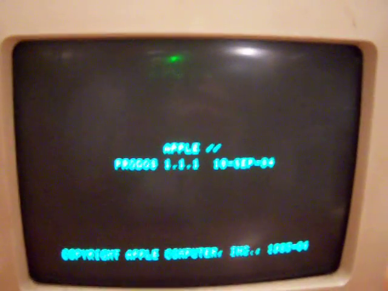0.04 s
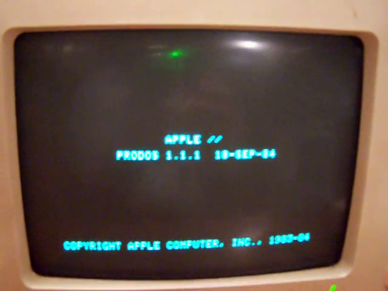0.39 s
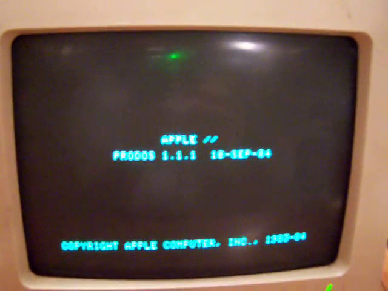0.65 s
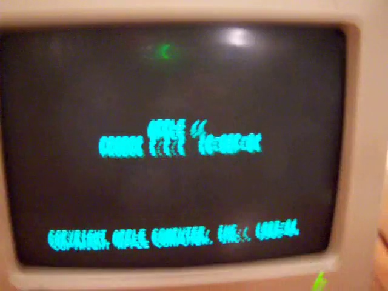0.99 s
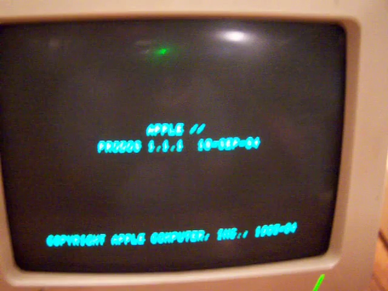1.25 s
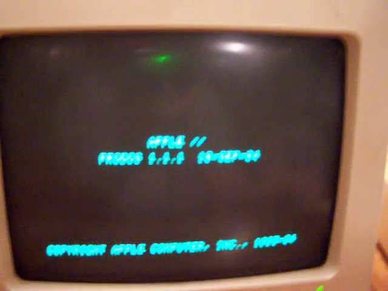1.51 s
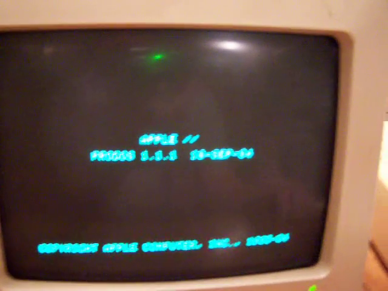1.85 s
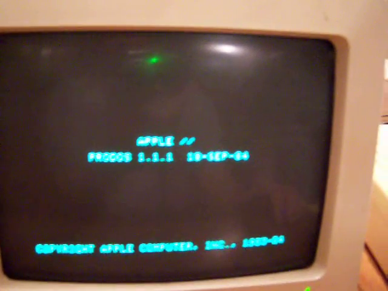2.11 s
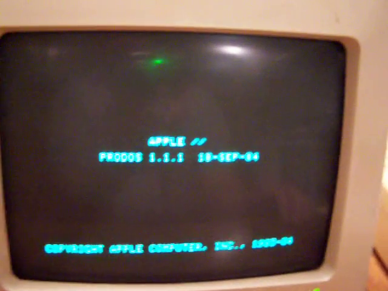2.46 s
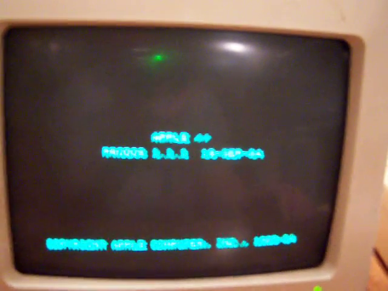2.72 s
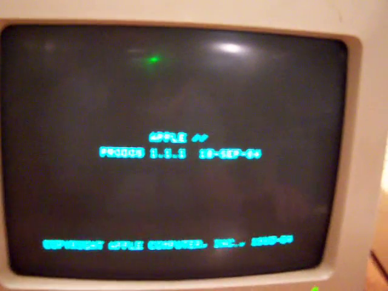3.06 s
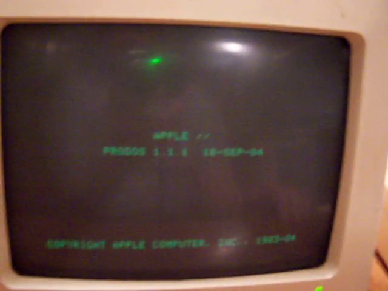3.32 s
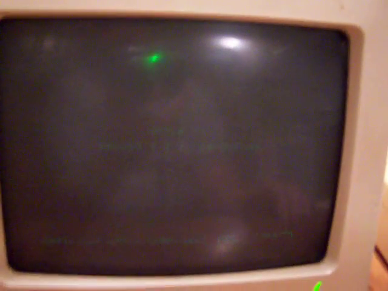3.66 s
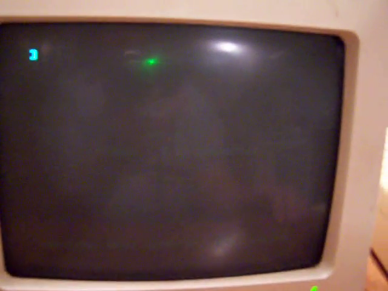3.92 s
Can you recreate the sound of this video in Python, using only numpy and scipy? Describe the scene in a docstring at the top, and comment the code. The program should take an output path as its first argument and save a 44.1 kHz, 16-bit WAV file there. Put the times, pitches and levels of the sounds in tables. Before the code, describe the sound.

Old computer running with fan hiss, motor whine and bursts of floppy drive clicking.

```python
"""An old computer runs in a small room, its motor whining over rushing fan air and a low hum.
The whine is made of high multiples of the rate at which the motor's shaft turns.
The floppy drive's head steps in short rattling runs, and at times the turning disk rubs in its sleeve.
A few small sharp clicks and soft low bumps come from nearby."""
import sys
import numpy as np
from scipy import signal
from scipy.fft import rfft, irfft, next_fast_len
from scipy.io import wavfile
from scipy.ndimage import uniform_filter1d, map_coordinates

SR = 44100
rng = np.random.default_rng(int(sys.argv[2]) if len(sys.argv) > 2 else 0)


def wrap_up_sound(samples):
    """Save the sound to the file named by the first command line argument, as 16-bit audio."""
    columns = np.atleast_2d(samples).T
    # keep every value between -1 and 1, then stretch to whole-number steps
    tamed = np.clip(columns, -1, 1)
    steps = np.round(tamed * 32767).astype(np.int16)
    wavfile.write(sys.argv[1], SR, steps)


N = 176400

# The motor's strong tones, each on a multiple of the shaft rate: pitch_hz, level_db
WHINE_TONES = [(1466, -69.5), (1649, -76), (1796, -73), (2455, -76), (2638, -71.5), (2748, -71.5),
               (2785, -70.5), (2822, -68.5), (3005, -66), (3225, -74), (3298, -59), (3371, -61),
               (3408, -72.5), (3445, -62.5), (3481, -58.5), (3518, -71.5), (3591, -68), (3701, -71),
               (3811, -64.5), (3921, -72.5), (3994, -71), (4104, -70), (4177, -67.5), (4214, -75),
               (4324, -72), (4397, -70.5), (4691, -70), (4874, -72.5)]
# How loud its many weak tones are, from low to high: pitch_hz, level_db
RASP_CURVE = [(500, -89), (1500, -88.5), (2400, -77.5), (3400, -82), (4500, -77), (5000, -84.5),
              (5400, -92.5), (6200, -89.5), (7000, -92), (8500, -104)]
# The tone colour of the fan's air: pitch_hz, gain_db
AIR_COLOUR = [(20, -8), (45, -7.5), (80, -7), (135, -7.5), (175, -2), (270, -5), (305, 1.5), (370, 0.5),
              (410, -4.5), (660, -10.5), (750, -6), (980, -15), (1280, -10.5), (1420, -16.5), (1620, -11.5),
              (1800, -19.5), (2800, -17.5), (3150, -9.5), (3450, -8.5), (3650, -9), (4200, -18),
              (4750, -17.5), (5200, -21.5), (6000, -25), (7600, -30.5), (9000, -31.5)]
# Low tones of the fan and the mains power: pitch_hz, level_db
HUM_TONES = [(60, -70), (211, -67), (229, -69.5), (253.4, -61), (469.7, -66)]
# How loud the mains hum is over time: time_s, level_db
MAINS_LEVELS = [(0, -67.5), (2.5, -68.5), (2.65, -60), (2.9, -59), (3.1, -64), (3.4, -61.5), (3.55, -67),
                (4, -69)]
# When the disk rubs: start_s, end_s, scrape_db, sing_db
DISK_RUBS = [(.36, 0.595, -57.5, -62), (1.238, 1.636, -55, -58), (1.336, 1.55, -54, -59.5),
             (1.655, 1.973, -58, -61), (3.534, 4.1, -54, -57.5)]
# Where the rubbing rings, broadly as a scrape and narrowly as singing: pitch_hz, width_hz, gain_db
SCRAPE_RESONANCES = [(755, 220, -3.5), (1120, 170, -4), (1290, 110, -1.5), (2204, 130, -5.5),
                     (3100, 180, -11.5), (3630, 230, 0), (4160, 580, -6.5), (5500, 820, -17)]
SING_RESONANCES = [(1328, 69, -6), (1561, 53, -1.5), (1640, 75, -0.5)]
# Steps of the drive's head: start_s, knock_db, rattle_db, ping_db
HEAD_STEPS = [(0.494, -45, -46, -33), (0.5, -44.5, -55, -38), (0.514, -52, -49, -50),
              (.526, -45.5, -52, -56), (0.536, -46.5, -41.5, -46), (.543, -44, -52, -46),
              (.555, -45, -38.5, -50), (.560, -51, -50, -46), (0.565, -44.5, -46, -53),
              (0.578, -57, -47, -57), (1.596, -43.5, -44, -46), (1.602, -49, -45.5, -49),
              (1.613, -47, -50, -60), (1.625, -49, -44, -46), (1.635, -53, -46, -54),
              (1.649, -43.5, -48, -60), (1.659, -41.5, -43.5, -44), (1.667, -48, -40.5, -55),
              (1.683, -52, -54, -56), (1.822, -48.5, -58, -64), (2.039, -43.5, -39.5, -55),
              (2.053, -40.5, -42, -48), (2.521, -45.5, -43, -54), (2.534, -40, -39.5, -35.5),
              (2.549, -52, -50, -58), (3.006, -42, -39, -53), (3.017, -40.5, -35, -47),
              (3.025, -47, -47, -52), (3.032, -56, -45, -54), (3.376, -43, -39, -41),
              (3.386, -45.5, -44, -59), (3.399, -44, -43, -48), (3.409, -44.5, -41, -51),
              (3.420, -44, -39, -49), (3.428, -43, -45, -50.5), (3.432, -39, -34.5, -38),
              (3.447, -39, -37, -43), (3.452, -46.5, -46, -47), (3.458, -43, -38, -44),
              (3.474, -38.5, -42, -37), (3.478, -43.5, -42.5, -41), (3.489, -47, -49, -38.5),
              (3.517, -49, -46, -65)]
# Where the drive's frame, the head's carriage and its rails ring: pitch_hz, width_hz, gain_db
FRAME_RESONANCES = [(276, 190, -5), (549, 30, 1), (690, 51, 0.5), (922, 68, 0), (1093, 204, -3),
                    (1347, 220, -3), (1690, 270, -7), (1976, 244, -2.5), (2310, 630, -8), (2845, 240, -6.5)]
CARRIAGE_RESONANCES = [(3150, 220, -5), (3520, 152, 3), (3873, 240, 1.5), (4064, 333, 0.5), (4610, 270, -5),
                       (5180, 300, -12), (5920, 270, -15), (7100, 900, -25.5)]
RAIL_RESONANCES = [(4084, 65, 1.5), (4126, 79, 10), (5380, 140, -6.5), (6160, 120, -16.5)]
# Soft low bumps: middle_s, half_length_s, level_db
SOFT_BUMPS = [(0.902, 0.059, -51.5), (1.09, .03, -69), (1.882, 0.012, -49.5), (1.928, 0.029, -48.5),
              (3.58, 0.04, -57.5)]
# The tone colour of their rumble: pitch_hz, gain_db
RUMBLE_COLOUR = [(20, -28), (70, 5.5), (110, -13), (150, 10), (220, -22), (450, -23), (1500, -57)]
# Sharp clicks: start_s, level_db, brightness_db_per_octave
SHARP_CLICKS = [(.870, -38, -11), (0.896, -31, -9), (1.0234, -25.5, 7.5), (1.033, -35, -3),
                (1.043, -42, -13)]
# The tones in a click: pitch_hz, gain_db, fade_s (every fade_s is the time to fall by 60 dB)
CLICK_TONES = [(1440, -18, 0.026), (1910, -12, .012), (2610, -4.5, 0.012), (3150, -2, 0.0088),
               (3930, -2, 0.008), (4240, -10.5, 0.021), (4740, -26, 0.024)]


def amp(db):
    """Turn decibels into a gain to multiply by."""
    return 10 ** (np.asarray(db) / 20)


def unit(x):
    """Scale a signal to an average power of 1."""
    return x / np.sqrt(np.mean(x ** 2) + 1e-20)


def clock():
    """The time of each sample in seconds."""
    return np.arange(N) / SR


def curve_at(points, hz):
    """Read between a table's points, with octaves evenly spaced."""
    pitches, values = np.transpose(points)
    return np.interp(np.log(hz + 1), np.log(pitches + 1), values)


def wobble(per_s):
    """A smooth curve through per_s random values a second."""
    return map_coordinates(rng.standard_normal(512), [clock() * per_s], mode="mirror")


def filtered(x, response):
    """Scale and shift each frequency in x by response(hz)."""
    size = next_fast_len(N + SR // 2)
    return irfft(rfft(x, size) * response(np.fft.rfftfreq(size, 1 / SR)), size)[:N]


def resonate(x, resonances):
    """Make x ring at the given pitches; plain noise keeps its power."""
    def response(hz):
        gain = sum((-1) ** k * amp(db) * 1j * hz * width / (pitch ** 2 - hz ** 2 + 1j * hz * width)
                   for k, (pitch, width, db) in enumerate(resonances))
        return gain / np.sqrt(np.mean(abs(gain) ** 2))
    return filtered(x, response)


def rush(colour, patchy_db):
    """Noise of a given colour, slightly uneven across pitch and time."""
    grid = signal.stft(rng.standard_normal(N), nperseg=512)[2]
    patches = uniform_filter1d(rng.standard_normal(grid.shape), size=5, axis=0)
    patches = uniform_filter1d(patches, size=12, axis=1)
    noise = signal.istft(grid * amp(patchy_db * unit(patches)), nperseg=512)[1][:N]
    return unit(filtered(noise, lambda hz: amp(curve_at(colour, hz))))


def motor(shaft_hz=36.645, wander=0.0003, scatter_db=4, flutter_db=0.04):
    """Every turn repeats the same fine rasp; some multiples of the shaft rate stand out as a whine."""
    turns = np.cumsum(shaft_hz * (1 + wander * wobble(4.03))) / SR
    multiples = np.arange(240)
    strong = [round(hz / shaft_hz) for hz, db in WHINE_TONES]
    weak = amp(curve_at(RASP_CURVE, multiples * shaft_hz) + scatter_db * rng.standard_normal(240))
    weak *= (multiples > 0) & ~np.isin(multiples, strong)  # leave gaps for the whine
    size = 8192
    one_turn = irfft(weak * np.exp(2j * np.pi * rng.random(240)), size) * size / 2
    out = np.interp(turns, np.arange(size) / size, one_turn, period=1)
    for multiple, (hz, db) in zip(strong, WHINE_TONES):
        out += amp(db + flutter_db * wobble(8.1)) * np.sin(2 * np.pi * (multiple * turns + rng.random()))
    return np.sqrt(2) * out


def fan(air_db=-49, whistle_db=-76.5, whistle_hz=6440, wander_hz=0.68, flutter_db=2.5):
    """Air rushes through the fan with a faint whistle and slightly unsteady low tones."""
    out = amp(air_db) * rush(AIR_COLOUR, patchy_db=0.75)
    out += amp(whistle_db) * resonate(rng.standard_normal(N), [(whistle_hz, 56, 0)])  # 56 Hz wide
    for hz, db in HUM_TONES:
        cycles = np.cumsum(hz + wander_hz * wobble(3)) / SR + rng.random()
        out += np.sqrt(2) * amp(db + flutter_db * wobble(2)) * np.sin(2 * np.pi * cycles)
    return out


def mains_hum(pitch_hz=120):
    """The electrical supply hums, swelling for about a second."""
    t = clock()
    level_db = np.interp(t, *np.transpose(MAINS_LEVELS))
    return np.sqrt(2) * amp(level_db) * np.sin(2 * np.pi * (pitch_hz * t + rng.random()))


def chatter(contacts_per_s=7000, scrape_share=0.82):
    """Surfaces touch: tiny random contacts over a smooth scrape."""
    contacts = (rng.random(N) < contacts_per_s / SR) * np.sign(rng.standard_normal(N))
    return np.sqrt(1 - scrape_share) * unit(contacts) + np.sqrt(scrape_share) * rng.standard_normal(N)


def disk_rub(ramp_s=0.071, spin_hz=5, swell_db=0.8):
    """The disk scrapes and sings in its sleeve, swelling a little once a turn."""
    t = clock()
    scrape_power, sing_power = np.zeros((2, N))
    for start, end, scrape_db, sing_db in DISK_RUBS:
        touch = np.clip(np.minimum(t - start, end - t) / ramp_s + 0.5, 0, 1)
        scrape_power += (amp(scrape_db) * touch) ** 2
        sing_power += (amp(sing_db) * touch) ** 2
    scrape = np.sqrt(scrape_power) * resonate(chatter(), SCRAPE_RESONANCES)
    sing = np.sqrt(sing_power) * resonate(chatter(), SING_RESONANCES)
    return amp(swell_db * np.sin(2 * np.pi * spin_hz * t)) * (scrape + sing)


def jolts(starts_s, levels_db, fade_s, rise_s=0.0016, hold_s=0.0013):
    """Bursts of chatter that rise quickly and die away."""
    t = np.arange(SR // 4) / SR
    shape = np.clip(t / rise_s, 0, 1) * amp(-60 * np.maximum(t - hold_s, 0) / fade_s)
    power = np.zeros(N + SR)
    for start, db in zip(starts_s, levels_db):
        power[round(start * SR):][:len(t)] += (amp(db) * shape) ** 2
    return np.sqrt(power[:N]) * chatter()


def head_steps():
    """Each step of the head knocks the frame, rattles the carriage and pings its rails."""
    starts_s, knock_db, rattle_db, ping_db = np.transpose(HEAD_STEPS)
    knock = resonate(jolts(starts_s, knock_db, fade_s=0.078), FRAME_RESONANCES)
    rattle = resonate(jolts(starts_s, rattle_db, fade_s=0.046), CARRIAGE_RESONANCES)
    ping = resonate(jolts(starts_s, ping_db, fade_s=0.035), RAIL_RESONANCES)
    return knock + rattle + ping


def bumps():
    """Low rumble swells softly and sinks away again."""
    swell = sum(amp(db) * np.exp(-((clock() - middle) / half) ** 2) for middle, half, db in SOFT_BUMPS)
    return swell * rush(RUMBLE_COLOUR, patchy_db=0.5)


def clicks(rise_s=0.00037):
    """Small hard contacts ring for a few milliseconds, each with its own brightness."""
    out, t = np.zeros(N + SR), np.arange(SR // 10) / SR
    for start, db, brightness in SHARP_CLICKS:
        ring = np.zeros(len(t))
        for hz, gain_db, fade_s in CLICK_TONES:
            tone_db = gain_db + brightness * np.log2(hz / 3000) + rng.standard_normal()
            ring += amp(tone_db - 60 * t / fade_s) * np.sin(2 * np.pi * (hz * t + rng.random()))
        out[round(start * SR):][:len(t)] += amp(db) * ring * (1 - np.exp(-t / rise_s))
    return out[:N]


def room_echo(x, gain_db=-5.5, rise_s=0.0036, fade_s=0.22):
    """The small room answers with a short, blurred echo."""
    t = np.arange(SR // 2) / SR
    tail = rng.standard_normal(len(t)) * amp(-60 * t / fade_s) * (1 - np.exp(-t / rise_s))
    return amp(gain_db) * signal.fftconvolve(x, tail / np.linalg.norm(tail))[:N]


def scene():
    """Mix everything into one channel; only the head steps and clicks get an echo."""
    taps = head_steps() + clicks()
    return (taps + room_echo(taps) + disk_rub() + motor() + fan() + mains_hum() + bumps())[None]


def record(dry):
    """The highest treble falls away steeply, then stops altogether."""
    roll_off_hz, top_hz = 8184, 8947
    return filtered(dry[0], lambda hz: (hz < top_hz) / (1 + (hz / roll_off_hz) ** 36))[None]


dry = scene()
out = record(dry)
wrap_up_sound(out)
```